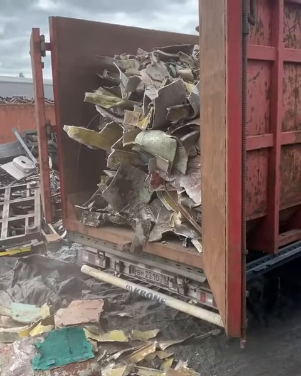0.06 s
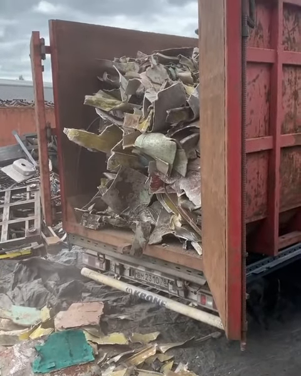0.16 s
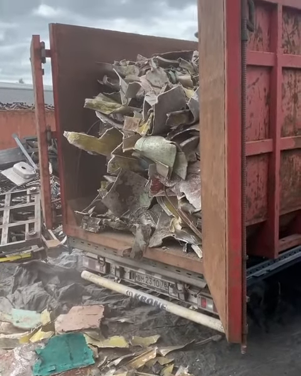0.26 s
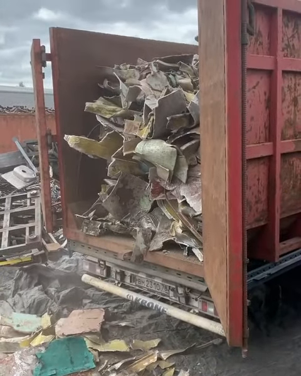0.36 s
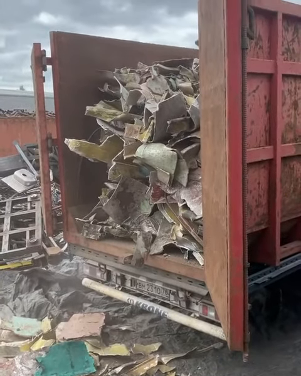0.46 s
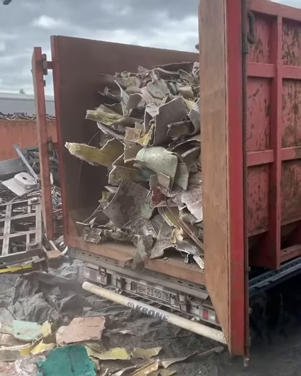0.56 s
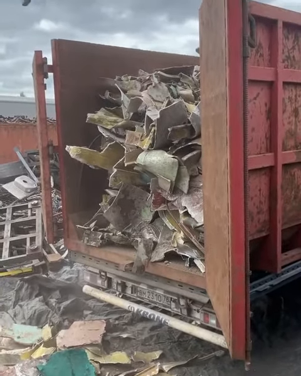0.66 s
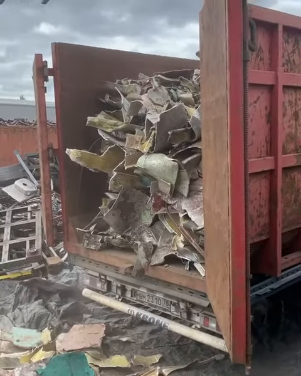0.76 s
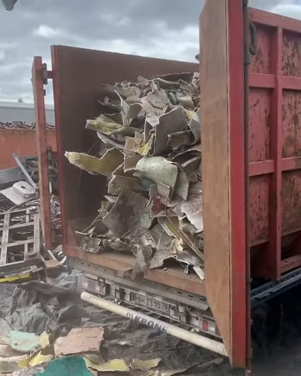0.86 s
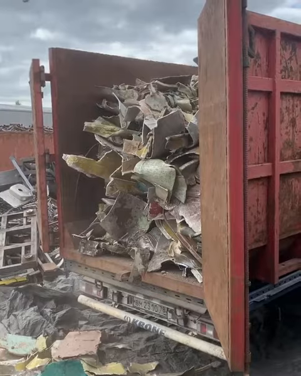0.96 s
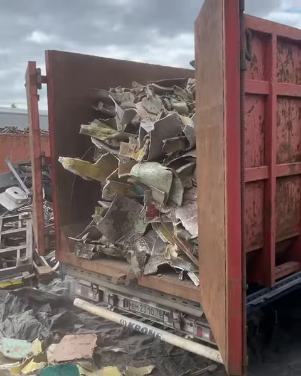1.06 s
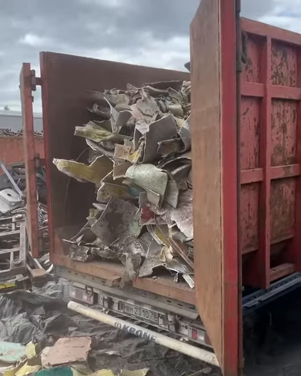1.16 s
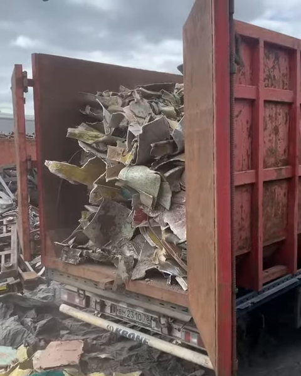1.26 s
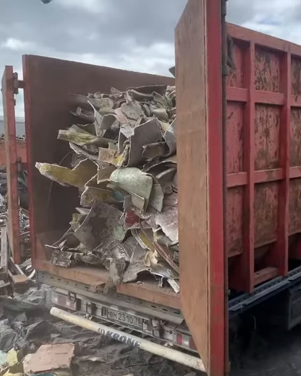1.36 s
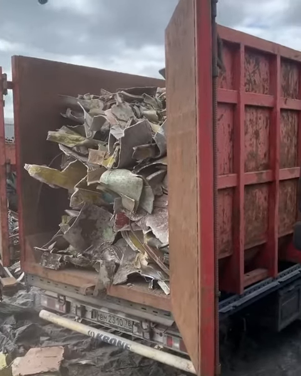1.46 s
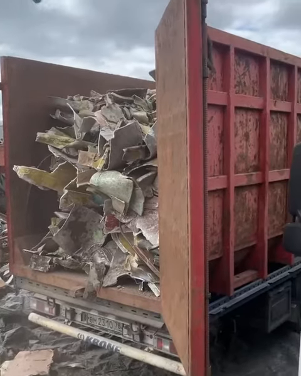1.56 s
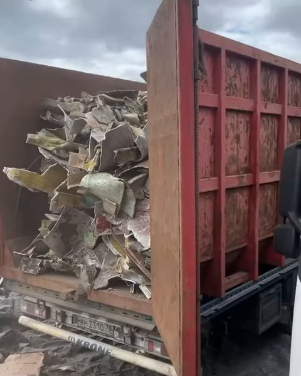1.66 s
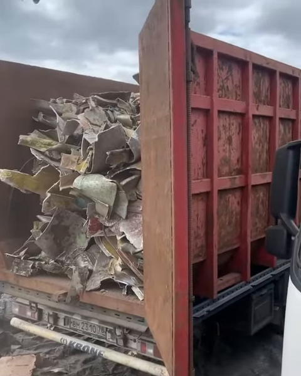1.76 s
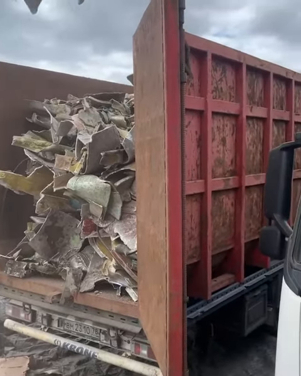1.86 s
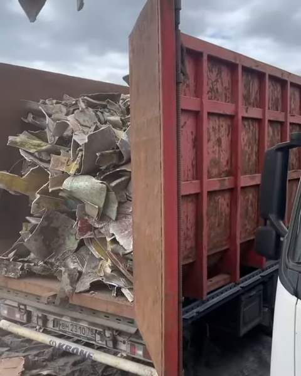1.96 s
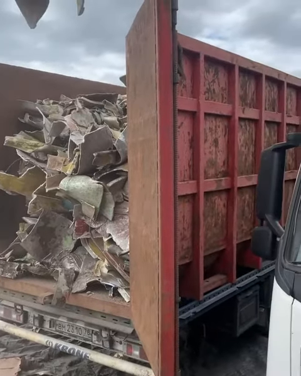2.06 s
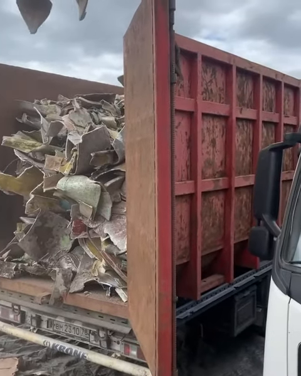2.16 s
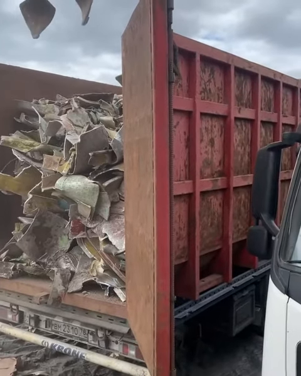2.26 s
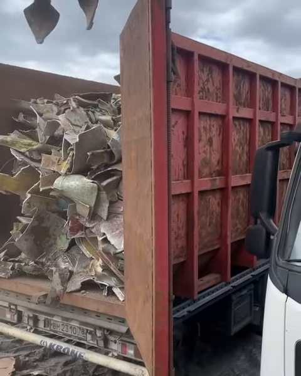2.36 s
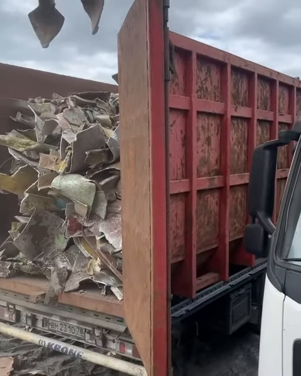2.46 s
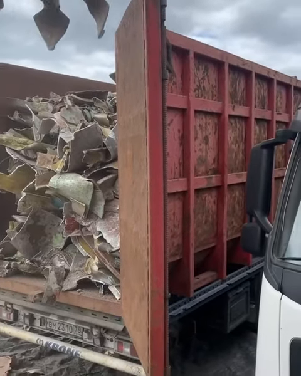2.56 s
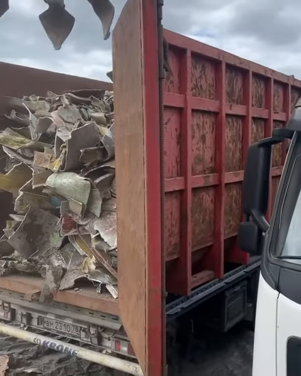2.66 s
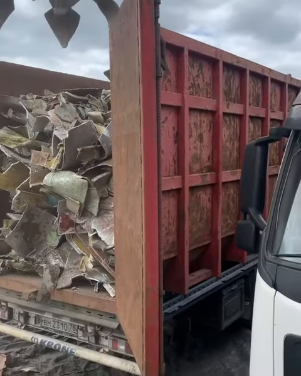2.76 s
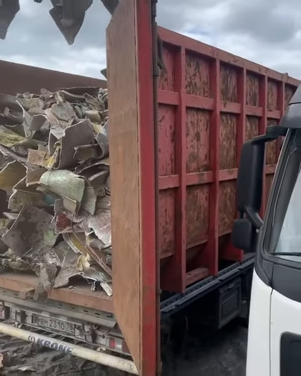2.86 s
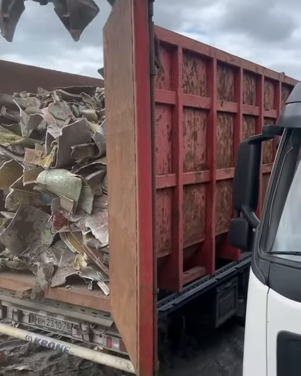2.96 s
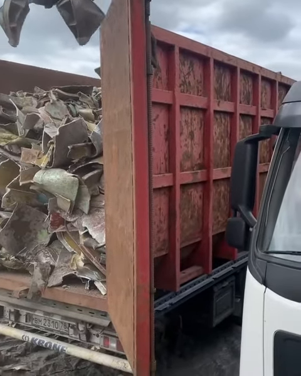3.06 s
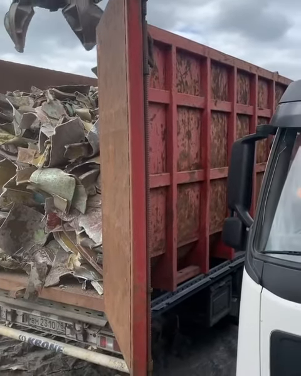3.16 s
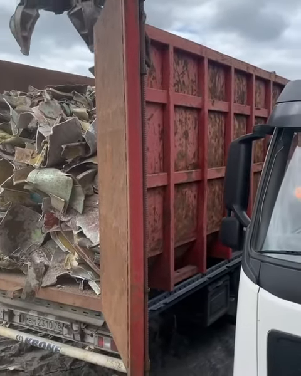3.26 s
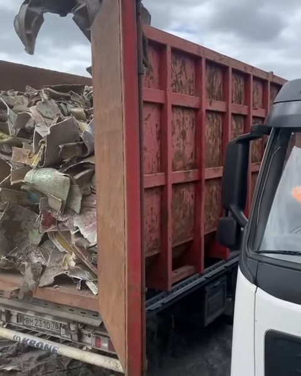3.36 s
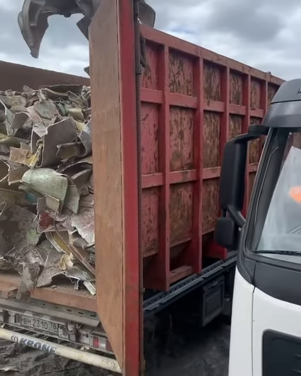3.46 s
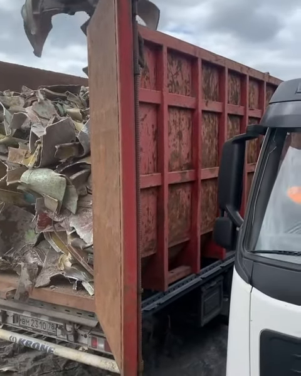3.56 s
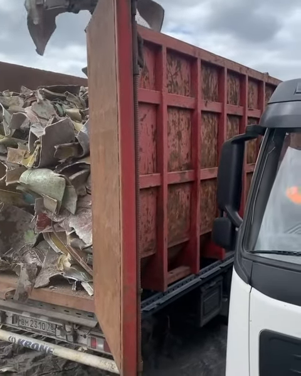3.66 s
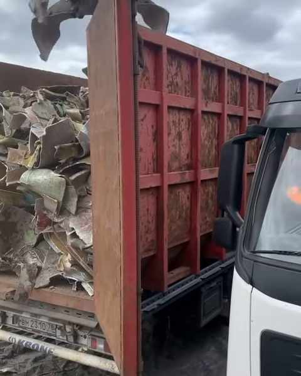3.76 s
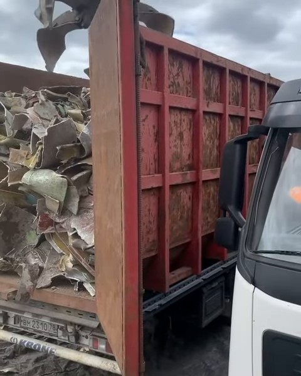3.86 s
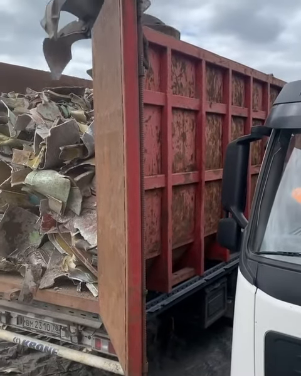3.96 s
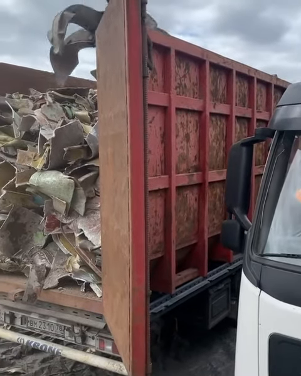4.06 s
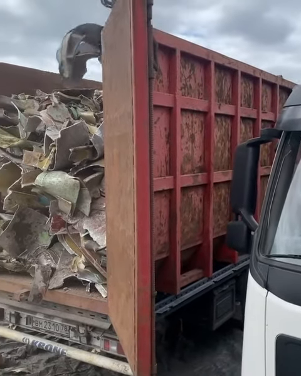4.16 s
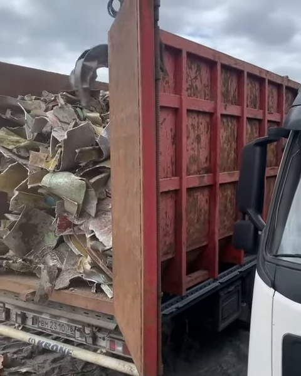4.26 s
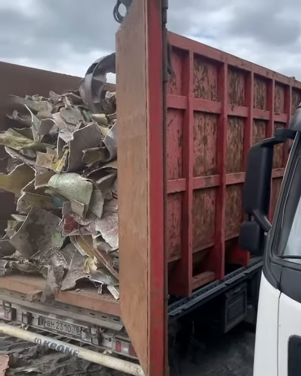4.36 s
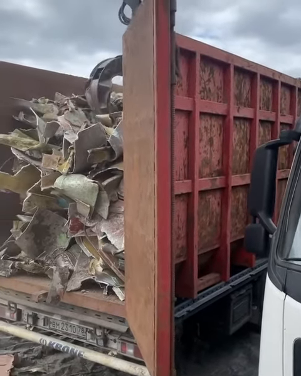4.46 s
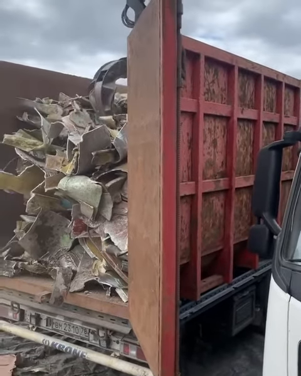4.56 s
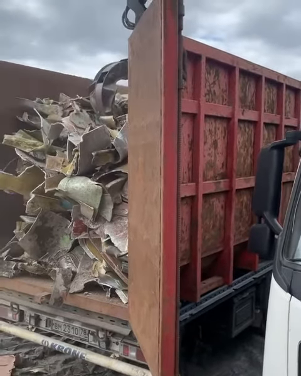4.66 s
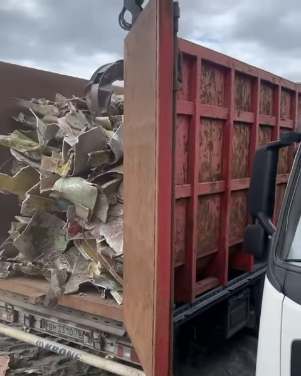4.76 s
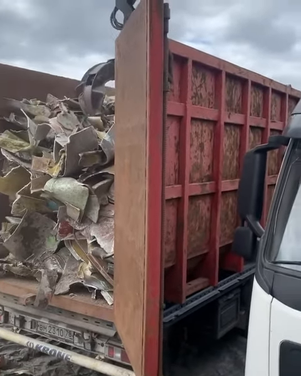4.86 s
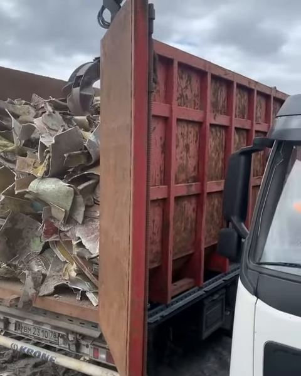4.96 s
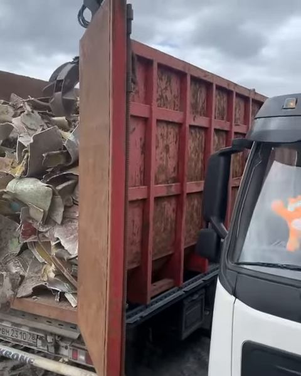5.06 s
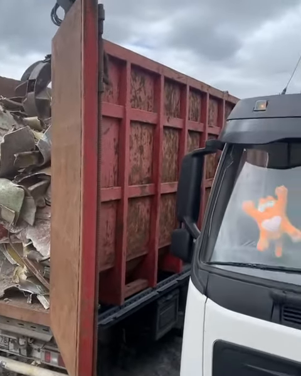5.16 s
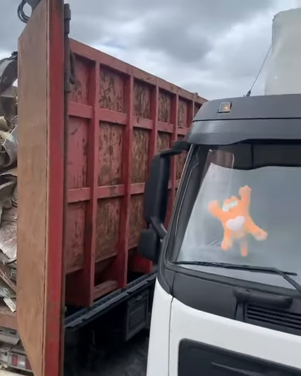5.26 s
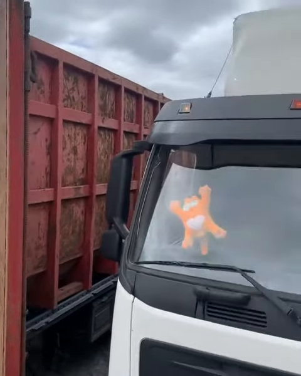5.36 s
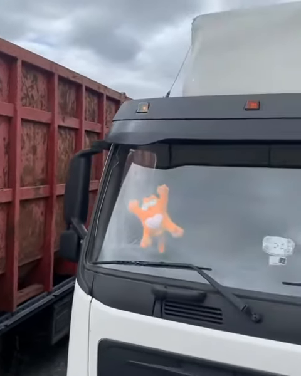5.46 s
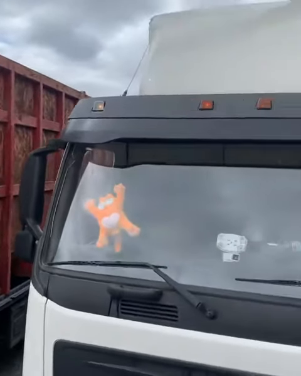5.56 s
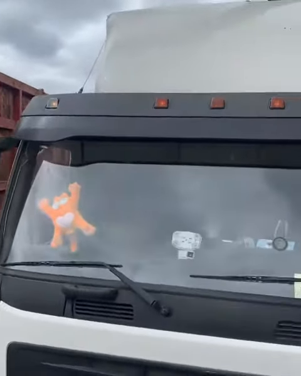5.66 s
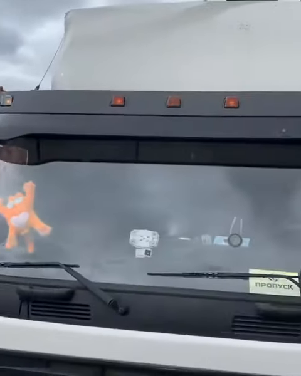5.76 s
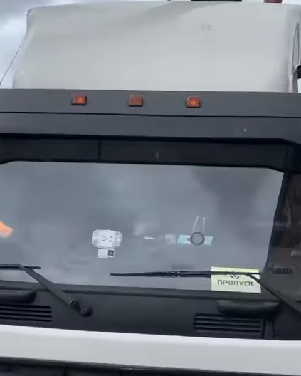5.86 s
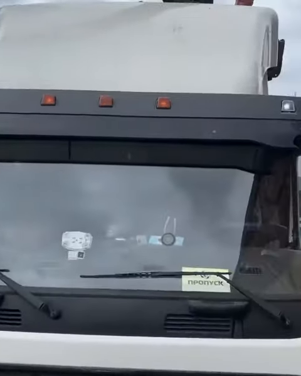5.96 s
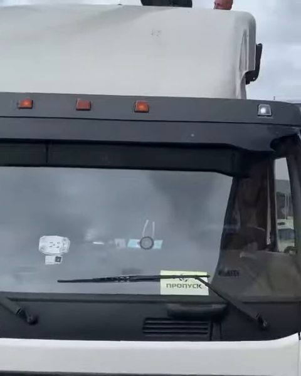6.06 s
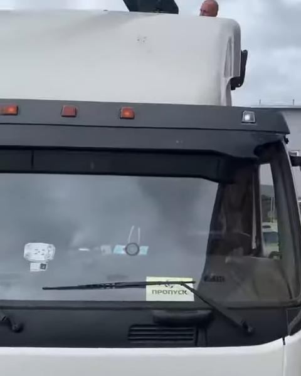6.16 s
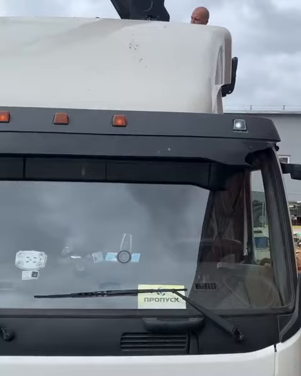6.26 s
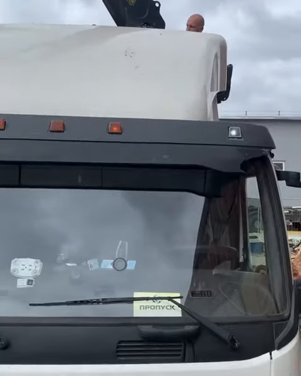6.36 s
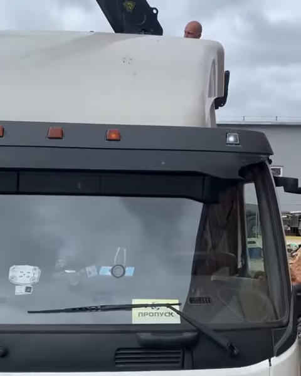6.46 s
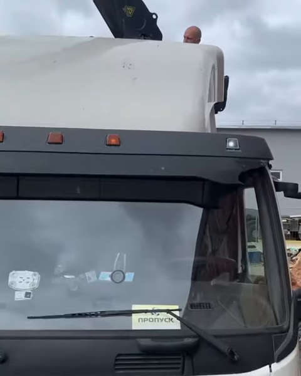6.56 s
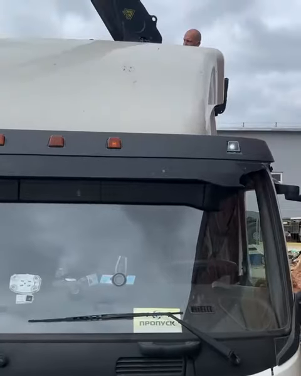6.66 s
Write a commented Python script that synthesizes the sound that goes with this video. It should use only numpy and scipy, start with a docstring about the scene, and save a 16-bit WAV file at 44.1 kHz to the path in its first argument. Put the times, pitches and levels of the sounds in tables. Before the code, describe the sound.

Steady engine throb in an open yard, broken by metallic crashes as a grab bites crumpled sheets and hauls them along a steel trailer.

```python
"""Beside a truck with a steel trailer: a hydraulic grab bites into crumpled sheet scrap and drags it along.
Crunches are swarms of small impacts that ring bent sheets, among hard clanks, booms, snaps and squeals.
Each shakes pieces loose that rattle as they settle; then the haul grows harder and brighter.
The trailer walls echo the scrap by delayed, decaying noise responses.
Firing pulses and clatter make the crane's diesel, slower pulses one further off; oil hisses in the valves."""
import sys
import numpy as np
from scipy import signal
from scipy.fft import rfft, irfft, next_fast_len
from scipy.io import wavfile
from scipy.ndimage import map_coordinates

SR = 44100
rng = np.random.default_rng(int(sys.argv[2]) if len(sys.argv) > 2 else 0)


def dump_mix(stems):
    """Bounce the given channels to the path in sys.argv[1] as a 16-bit WAV at rate SR."""
    frames = np.atleast_2d(stems).T  # one column per channel
    limited = np.clip(frames, -1, 1)  # hard clip at full scale
    pcm = np.round(limited * 32767).astype(np.int16)
    wavfile.write(sys.argv[1], SR, pcm)


N = 295470

T = np.arange(N) / SR
PADDED = next_fast_len(N + 8192)
FREQS = np.arange(PADDED // 2 + 1) * SR / PADDED

# sheets buckle and fall: [onset t/s, length t/s, level/dB before weighting, bass weight/dB, treble weight/dB]
CRUNCH_EVENTS = [(3.918, 0.047, -44, -2, -1), (3.963, 0.035, -28.5, -4, 2), (4.05, 0.063, -28.5, -10, 0),
                 (4.111, 0.047, -17.5, -4.5, -1.5), (4.219, 0.043, -18.5, -1.5, 1),
                 (4.27, 0.043, -21.5, -1.5, -1), (4.324, 0.045, -32, -3, 1), (4.369, 0.013, -34, 11.5, -14),
                 (4.412, 0.084, -33, -0.5, -2.5), (4.524, 0.031, -29.5, 3.5, -6),
                 (4.648, 0.026, -43, 10.5, -14), (4.91, 0.0078, -48.5, 18.5, -15),
                 (4.948, 0.019, -48, 12, -19), (5.012, 0.038, -31, -6, -7), (5.109, 0.054, -35, 3.5, -5),
                 (5.155, 0.048, -31.5, -2, 0), (5.357, 0.047, -24, -2, -6), (5.423, 0.019, -32, 7.5, -0.5),
                 (5.464, 0.028, -29, 5, -4), (5.511, 0.065, -23.5, -2, 0.5), (5.583, 0.038, -26.5, 3.5, 0),
                 (5.729, 0.031, -28.5, 4, 3), (5.772, 0.031, -43.5, 10, 24.5),
                 (5.918, 0.032, -30.5, -12, 5.5), (5.951, 0.078, -29, 8, -25), (6.06, 0.036, -34.5, 7, -13),
                 (6.104, 0.066, -28, 2.5, 1), (6.167, 0.041, -26, 4.5, 0), (6.242, 0.048, -20, 3, 0.5),
                 (6.355, 0.064, -22, 1, 5.5), (6.447, 0.035, -26.5, -5, 5), (6.508, 0.042, -21, 0, 9),
                 (6.555, 0.026, -28, -11, 7.5), (6.653, 0.034, -33, -18, 14)]
# what the heap radiates: [f/Hz, spectral density level/dB]
HEAP_SPECTRUM = [(30, -18), (70, -13.5), (120, -7.5), (180, -1.5), (420, -2), (700, -4), (1000, -7.5),
                 (1500, -5), (2400, -9), (4300, -10.5), (6000, -17), (8000, -21.5), (9500, -22.5),
                 (11800, -29.5), (13000, -41)]
# modes of a stiff piece: [multiple of its pitch, level/dB]
PLATE_MODES = [(0.647, -3.5), (1.001, 1.5), (1.329, -0.5), (1.46, -6), (1.944, -4.5), (2.31, -6.5),
               (2.56, -7), (2.83, -14)]
FIRST_TOUCH_S = CRUNCH_EVENTS[0][0]

# the grab starts to pull and takes up the load
PULL_START_S, PULL_RISE_S = 4.723, 0.3


# tools

def undb(db):
    """Level in decibels to amplitude ratio."""
    return 10 ** (np.asarray(db) / 20)


def unit(x):
    """Normalise the effective value: rms 1."""
    return x / np.sqrt(np.mean(x ** 2) + 1e-18)


def across(table, hz):
    """Linear interpolation of each table column on a log-frequency axis."""
    f, *columns = np.transpose(table)
    return [np.interp(np.log(hz + 1), np.log(f), c) for c in columns]


def ring(x, response):
    """Linear system: convolve a sound with an impulse response."""
    return signal.fftconvolve(np.atleast_2d(x), np.atleast_2d(response), axes=1)[:, :x.shape[-1]]


def colour(x, table):
    """Minimum-phase filter: the folded cepstrum of a level response gives a causal impulse response."""
    size = 4096
    level_db, = across(table, np.arange(size // 2 + 1) * SR / size)
    cepstrum = irfft(np.log(undb(level_db)))
    cepstrum[1:size // 2] *= 2
    cepstrum[size // 2 + 1:] = 0
    return ring(x, irfft(np.exp(rfft(cepstrum))))


def heft(x, bass_db, treble_db, bass_hz=600, treble_hz=3600):
    """Spectral weighting by size: big pieces add bass, thin edges add treble."""
    size = x.shape[1]
    hz = np.arange(size // 2 + 1) * SR / size
    spectrum = rfft(x)
    bass = irfft(spectrum / (1 + (hz / bass_hz) ** 4), size)
    treble = irfft(spectrum * (1 - 1 / (1 + (hz / treble_hz) ** 4)), size)
    return x + (undb(bass_db) - 1) * bass + (undb(treble_db) - 1) * treble


def walk(rate, size=N):
    """Slow random modulation: random points, rate a second, joined by lines; spread near 1."""
    points = rng.standard_normal(4096)
    return 1.21 * np.interp(T[:size] * rate, np.arange(len(points)), points)


def wander(x, depth, rate):
    """Frequency modulation by time warping: all resonances drift together by the share depth."""
    place = np.cumsum(1 + depth * walk(rate, size=x.shape[1]))
    return np.array([map_coordinates(row, [place], mode="mirror") for row in x])


def tone(hz, waver, rate):
    """Frequency-modulated sine: the phase integrates a wavering pitch; rms 1."""
    turns = np.cumsum(hz * (1 + waver * walk(rate))) / SR
    return unit(np.sin(2 * np.pi * turns))


def fade(t, t60):
    """Exponential damping: 60 dB down after t60."""
    return np.exp(-np.log(1000) * t / t60)


def ramp(start_s, rise_s):
    """Linear onset: from 0 to 1 in rise_s, beginning at start_s."""
    return np.clip((T - start_s) / rise_s, 0, 1)


def add(out, sound, s, db):
    """Superposition: mix a sound in at time s."""
    start = int(s * SR)
    out[:, start:start + sound.shape[1]] += undb(db) * sound[:, :N - start]


def body(x, length):
    """Onset normalisation: each channel has rms 1 over the first length seconds plus 8 ms."""
    onset = x[:, :int((length + .008) * SR)]
    return x / np.sqrt(np.mean(onset ** 2, axis=1, keepdims=True) + 1e-18)


# engines and hydraulics

def effort(db_per_s=1.19, lower_s=2.51, lower_rise_s=0.08, lower_db=2.5):
    """Load response in dB: a steady gain as the boom works and a step as the grab is lowered."""
    return db_per_s * T + lower_db * ramp(lower_s, lower_rise_s)


def firings(hz, cylinders_db, scatter_db):
    """Periodic excitation: unequal pulses through a silencer; also returns the phase within each firing."""
    # silencer response: [f/Hz, level/dB]
    silencer = [(25, -11), (44, -3.5), (90, -1.5), (135, -2), (180, -3.5), (240, -7.5), (365, -11.5),
                (560, -30), (900, -24.5), (3000, -88)]
    turns = np.cumsum(hz * (1 + 0.0021 * walk(3.33))) / SR
    at = np.flatnonzero(np.diff(np.floor(turns)))
    scatter = scatter_db * rng.standard_normal(N)[:len(at)]
    pulses = np.zeros(N)
    pulses[at] = undb(np.resize(cylinders_db, len(at)) + scatter)
    return unit(colour(pulses - pulses.mean(), silencer)), turns % 1


def diesels(start_db=-47, exhaust_db=-5, far_db=-10, clatter_db=0, hum_waver=0.00804, hum_flutter_db=2.0,
            throb=0.11, drift=.012, swell_db=0.6):
    """Source and resonator: pulsed noise excites the housing, beside hum and the thuds of two engines."""
    # combustion clatter of the block: [f/Hz, spectral density level/dB]
    block_spectrum = [(30, -6), (55, -29), (85, -0.5), (180, -7), (450, -6.5), (700, -3), (1200, -4),
                      (1800, -10), (2600, -22), (4000, -29), (12000, -29.5)]
    # housing resonances: [f/Hz, full width at half amplitude/Hz, level over the clatter/dB]
    housing_modes = [(358, 57, 10), (554.7, 100, 11.5)]
    # engine and pump hum: [f/Hz, level against the clatter/dB, gain as the grab is lowered/dB]
    hum_lines = [(167, -23.5, -0.5), (300.4, -19, -1), (368, -11.5, 0), (550, -13.5, 3)]
    db = start_db + effort()
    cylinders_db = [9.0, 10.0, 12.5, -4.0, 11.0, 10.0]
    near, phase = firings(45.1, cylinders_db, scatter_db=-1.0)
    far, _ = firings(39.35, [0, 1, -1, 0], scatter_db=-3.0)
    knock = .06 * np.cos(2 * np.pi * phase)
    # the throb sags through each firing interval and jumps back at the next
    sag = throb * np.cos(2 * np.pi * phase / len(cylinders_db))
    pulsing = 1 + knock + sag

    clatter = colour(rng.standard_normal((2, N)) * pulsing, block_spectrum)
    spectrum = rfft(clatter, PADDED)
    housing = np.zeros((2, N))
    for hz, width, gain in housing_modes:
        resonance = irfft(spectrum / (1 + (2 * (FREQS - hz) / width) ** 2), PADDED)[:, :N]
        # each swells and sinks on its own
        housing += resonance * undb(gain + swell_db * walk(9))
    clatter = unit(wander(clatter + housing, drift, rate=5)) * undb(clatter_db)

    lowering = ramp(2.51, 0.08)  # in step with effort()
    hum = np.zeros(N)
    for hz, gain, more in hum_lines:
        hum += undb(gain + more * lowering + hum_flutter_db * walk(12)) * tone(hz, hum_waver, rate=16)

    # low thud bends round the truck: both engines' thuds change by half the dB of the clatter
    thud = undb(exhaust_db) * near + undb(far_db) * far
    thud = thud * undb(db[0] + 0.5 * (db - db[0]))
    shared_only = np.array([[1], [0]])
    return clatter * undb(db) + (hum * pulsing * undb(db) + thud) * shared_only


def valves(oil_db=-65.5, oil_per_engine_db=0.96, jaws_s=3.15, jaws_rise_s=0.3, jaws_db=-61, flutter_db=.7):
    """Flow noise: oil hisses harder with engine load; a thinner hiss joins as the jaws are driven."""
    # valve hiss: [f/Hz, spectral density level/dB]
    oil_spectrum = [(1000, -49), (3000, 11.5), (5600, 13.5), (6500, -25), (12000, -12)]
    # hiss of the jaws' valve: [f/Hz, spectral density level/dB]
    jaw_spectrum = [(1500, -25), (4000, 2), (7500, -10), (9500, 4), (11500, -15), (13000, -9)]
    oil = unit(colour(rng.standard_normal((2, N)), oil_spectrum))
    oil = oil * undb(oil_db + oil_per_engine_db * effort())
    jaws = unit(colour(rng.standard_normal((2, N)), jaw_spectrum))
    jaws = jaws * undb(jaws_db) * ramp(jaws_s, jaws_rise_s)
    return (oil + jaws) * undb(flutter_db * walk(8.2))


# excitation and resonators of the scrap

def impacts(count, rate, scatter_db):
    """Poisson process: random small blows of uneven force, on average rate a second."""
    chance, force = rng.random(count), rng.standard_normal(count)
    return (chance < rate / SR) * undb(scatter_db * np.clip(force, -2, 2))


def burst(length, rate=1300, scatter_db=3, bite=0.63, bite_t60=0.097, release_t60=0.08, attack_s=0.0085,
          jerks_per_s=130, jerk_db=3, size=24000):
    """Stick-slip swarm: impacts build quickly to their hardest, come in jerks, then die away."""
    t = np.arange(size) / SR
    attack = np.minimum(t / attack_s, 1) * (1 + bite * fade(t, bite_t60))
    release = fade(np.maximum(t - length, 0), release_t60)
    jerks = undb(jerk_db * np.clip(walk(jerks_per_s, size=size), -1.5, 1.5))
    return attack * release * jerks * impacts(size, rate, scatter_db)


def sheet(ring_t60=.13, crack_t60=.012, ring_db=3, spacing=.11, size=16384):
    """Modal response of a bent sheet: a crack and scattered modes, the high ones dying first; unit energy."""
    t, hz = np.arange(size) / SR, np.arange(size // 2 + 1) * SR / size
    # mean mode spacing grows with pitch
    apart_hz = 20 + spacing * np.minimum(hz, 4500)
    present = rng.random(len(hz)) < SR / size / apart_hz
    phases = np.exp(2j * np.pi * rng.random((2, len(hz))))
    modes = present * np.sqrt(apart_hz) * phases
    low = 1 / (1 + (hz / 3000) ** 4)
    low_tones = irfft(modes * low) * fade(t, ring_t60)
    high_tones = .75 * irfft(modes * (1 - low)) * fade(t, ring_t60 * .6)
    crack = rng.standard_normal((2, size)) * fade(t, crack_t60)
    return unit(unit(crack) + undb(ring_db) * unit(low_tones + high_tones)) / np.sqrt(size)


# loose and hauled scrap

def pull(start_db=-39.5, db_per_s=5):
    """Exponential growth: the haul sets in as the grab pulls and keeps gaining level."""
    return ramp(PULL_START_S, PULL_RISE_S) * undb(start_db + db_per_s * (T - PULL_START_S))


def unrest(loose_db=-9, shake_s=0.06, fall_s=0.069, settle_t60_s=1.09):
    """Energy balance: loose pieces land a fall after each crunch and feed in energy, which drains away."""
    # loose_db is against a crunch held for shake_s
    feed = np.zeros(N)
    for s, length, db, _, _ in CRUNCH_EVENTS:
        start, end = int((s + fall_s) * SR), int((s + fall_s + length) * SR)
        feed[start:end] += undb(db + loose_db) ** 2 / (shake_s * SR)
    kept = fade(1 / SR, settle_t60_s) ** 2
    return np.sqrt(signal.lfilter([1], [1, -kept], feed))


def rumble(low_hz=42, high_hz=105, load_db=-46, settle_db=-32):
    """Band-limited impact noise: moving load and settling pieces bump on the trailer floor."""
    load = undb(load_db) * ramp(PULL_START_S, PULL_RISE_S)
    strength = np.hypot(load, undb(settle_db) * unrest())
    bumps = impacts(N, 300, 5.4) * rng.standard_normal((2, N))
    floor = signal.butter(3, [low_hz, high_hz], "band", fs=SR, output="sos")
    return unit(signal.sosfilt(floor, bumps)) * strength


def rattle(rate=280, scatter_db=4, uneven_db=4, count=130, contact_s=.055, size=8192):
    """Friction as repeated impact: loose sheets catch and slip in brief, overlapping scrapes."""
    contact = np.sin(np.pi * np.minimum(np.arange(size) / SR / contact_s, 1))
    out = np.zeros((2, N))
    for s in np.linspace(FIRST_TOUCH_S - .1, N / SR, count, endpoint=False):
        blows = contact * impacts(size, rate, scatter_db)
        scrape = ring(blows, sheet(ring_db=5, spacing=.16, size=size))
        add(out, unit(scrape), s, rng.uniform(-uneven_db, uneven_db))
    # rms 1 over the sounding part
    return unit(colour(out, HEAP_SPECTRUM)) * np.sqrt(np.mean(T > FIRST_TOUCH_S))


def grinding(settle_bass_db=-1, settle_treble_db=-10, pull_bass_db=6, pull_treble_db=-6,
             pull_bass_db_per_s=-3.5, pull_treble_db_per_s=7.5):
    """Energy addition: pieces settle dully; hauled ones scrape ever thinner and brighter and take over."""
    settling, hauled = unrest() ** 2, pull() ** 2
    share = hauled / (settling + hauled + 1e-18)
    hauling_s = np.maximum(T - PULL_START_S, 0)
    # more thin edges scrape as the pull hardens, while the big pieces lift clear
    edges_db = pull_treble_db + pull_treble_db_per_s * hauling_s
    big_db = pull_bass_db + pull_bass_db_per_s * hauling_s
    bass_db = (1 - share) * settle_bass_db + share * big_db
    treble_energy = (1 - share) * undb(settle_treble_db) ** 2 + share * undb(edges_db) ** 2
    return heft(rattle(), bass_db, 10 * np.log10(treble_energy)) * np.sqrt(settling + hauled)


def offcuts(level_db=-10, low_hz=800, high_hz=4600, ring_t60=.06, count=130, uneven_db=4, bounce_s=.03,
            rebound=.55, small_db_per_octave=-4, contact_s=.001, size=6000):
    """Inelastic rebound: small stiff pieces land and bounce twice, sooner and softer; higher ones are fainter."""
    t = np.arange(size) / SR
    envelope = np.minimum(t / contact_s, 1) * fade(t, ring_t60)
    sizes = rebound ** np.arange(3)
    out = np.zeros((2, N))
    for when, small, force, drop in rng.random((count, 4)):
        s = FIRST_TOUCH_S + when * (N / SR - FIRST_TOUCH_S)
        hz = low_hz * (high_hz / low_hz) ** small
        tones = np.zeros((2, size))
        for ratio, mode_db in PLATE_MODES:
            tones += undb(mode_db) * np.sin(2 * np.pi * (hz * ratio * t + rng.random((2, 1))))
        landing_s = (np.cumsum(sizes) - 1) * bounce_s * (1 + drop)
        landings = np.zeros((2, size))
        landings[:, (landing_s * SR).astype(int)] = sizes
        db = uneven_db * (2 * force - 1) + small_db_per_octave * np.log2(hz / low_hz)
        add(out, ring(landings, tones * envelope), s, db)
    even = unit(out) * np.sqrt(np.mean(T > FIRST_TOUCH_S))
    return even * undb(level_db) * np.hypot(unrest(), pull())


# the grab's bites and blows

def squeals(waver=0.0031, rise_s=0.029, ring_t60=0.13):
    """Self-excited vibration: a slipping edge drives one mode, which rings on after it lets go."""
    # an edge slips and sings: [onset t/s, length t/s, f/Hz, level/dB]
    slips = [(5.3, 0.17, 2800, -61), (3.7, 0.022, 4000, -33), (6.533, 0.18, 5600, -43),
             (6.616, 0.064, 1983, -31), (6.644, 0.024, 4000, -20), (6.62, 0.068, 3290, -37)]
    out = np.zeros(N)
    for s, length, hz, db in slips:
        drive = ramp(s, rise_s) * fade(np.maximum(T - s - length, 0), ring_t60)
        out += undb(db) * drive * tone(hz, waver, rate=120)
    return np.array([out, out * 0.15])


def booms(sharpness=2.94):
    """Damped resonance: a swarm of impacts drives one broad mode of a large flexing panel."""
    # panel flexes: [onset t/s, length t/s, f/Hz, level/dB]
    flexes = [(4.11, 0.013, 230, -26.5), (4.113, 0.038, 434, -18), (4.158, 0.016, 216, -26),
              (4.228, 0.062, 169, -26), (4.271, 0.021, 610, -23), (4.532, 0.025, 177, -36.5),
              (5.745, 0.024, 201, -33.5), (6.13, 0.14, 48, -44), (6.242, 0.027, 410, -28.5),
              (6.273, .035, 253, -27), (6.365, 0.02, 246, -30), (6.516, 0.025, 750, -20.5),
              (6.522, 0.035, 238, -38), (6.514, 0.024, 1330, -23)]
    out = np.zeros((2, N))
    for s, length, hz, db in flexes:
        blows = ring(burst(length), sheet(ring_db=-17.5))
        b, a = signal.iirpeak(hz, sharpness, fs=SR)
        boom = signal.lfilter(b, a, signal.lfilter(b, a, blows))
        add(out, body(boom, length), s, db)
    return out


def ticks(sharpness=1.8, snap=1.7):
    """Impulse excitation: a thin edge snaps free and skips over its neighbour, ringing high and briefly."""
    # edges snap and scratch: [onset t/s, length t/s, f/Hz, level/dB]
    snaps = [(4.05, 0.007, 9500, -37), (4.063, 0.0099, 10000, -46), (4.129, .025, 10800, -38.5),
             (4.461, 0.004, 11600, -47.5), (4.535, 0.014, 10600, -50.5), (4.594, .012, 9000, -51.5),
             (4.794, .014, 10600, -59), (5.03, 0.017, 10500, -51), (5.091, .016, 7000, -48),
             (5.695, .012, 7900, -50), (5.861, 0.012, 6260, -44), (6.177, 0.0088, 6260, -31),
             (6.336, 0.021, 6260, -35), (6.489, 0.039, 6600, -36), (6.516, 0.016, 9200, -26)]
    out = np.zeros((2, N))
    for s, length, hz, db in snaps:
        skips = burst(length, rate=660, release_t60=0.039)
        skips[0] += snap
        edge = ring(skips, sheet(ring_t60=0.06, ring_db=0, spacing=0.14))
        b, a = signal.iirpeak(min(hz, 13000), sharpness, fs=SR)
        sound = signal.lfilter(b, a, signal.lfilter(b, a, edge))
        add(out, body(sound, length), s, db)
    return out


def clanks(crack_db=-1, crack_treble_db=-7, crack_t60=0.023, contact_s=0.0045, flex=0.0099, flex_t60=0.12,
           pair=0.012, size=24000):
    """Modal beating: after a crack, close pairs of stiff modes beat and sink a little as the piece unbends."""
    # hard blows: [onset t/s, reference pitch f/Hz, level/dB, ring t60/s of the lowest modes]
    hard_blows = [(3.968, 1740, -36, .14), (4.122, 1500, -27, .1), (4.132, 1250, -21, .12),
                  (4.145, 1560, -22, .11), (4.159, 730, -23, .1), (4.225, 1218, -26, .18),
                  (4.258, 1820, -25, .16), (4.285, 1437, -22, .28), (4.35, 1140, -31, .3),
                  (4.456, 1880, -36, .18), (4.545, 1330, -33, .2), (4.632, 1700, -41, .15),
                  (4.686, 1200, -42, .14), (5.02, 1500, -37, .2), (5.168, 1510, -36, .2),
                  (5.362, 1850, -30, .2), (5.467, 1650, -32, .18), (5.52, 1950, -30.5, .16),
                  (5.59, 1400, -32, .2), (5.761, 1150, -29, .16), (5.958, 1640, -29, .22),
                  (6.122, 1360, -30, .2), (6.182, 1900, -28, .16), (6.249, 1430, -23, .18),
                  (6.289, 1980, -25, .15), (6.377, 1240, -26, .18), (6.392, 1600, -25, .18),
                  (6.518, 1362, -17.5, .3), (6.545, 1410, -18.5, .14), (6.586, 1600, -26, .2)]
    t = np.arange(size) / SR
    seconds = np.cumsum(1 + flex * fade(t, flex_t60)) / SR
    crack_envelope = np.minimum(t / contact_s, 1) * fade(t, crack_t60)
    out = np.zeros((2, N))
    for s, hz, db, t60 in hard_blows:
        tones = np.zeros((2, size))
        for ratio, mode_db in PLATE_MODES:
            turns = hz * ratio * seconds
            start, twin = rng.random((2, 2, 1))
            first = np.sin(2 * np.pi * (turns + start))
            second = .5 * np.sin(2 * np.pi * (turns * (1 + pair) + twin))
            # higher modes die sooner
            tones += undb(mode_db) * (first + second) * fade(t, t60 / np.sqrt(max(ratio, 1)))
        crack = colour(rng.standard_normal((2, size)) * crack_envelope, HEAP_SPECTRUM)
        crack = heft(crack, 0, crack_treble_db)
        add(out, body(tones, 0) + undb(crack_db) * body(crack, 0), s, db)
    return out


def crunches(bend=.009, bend_rate=45):
    """Impact-excited plates: swarms of blows ring two sheets, whose pitch bends as they buckle."""
    out = np.zeros((2, N))
    for s, length, db, bass_db, treble_db in CRUNCH_EVENTS:
        clang = np.zeros((2, 24000))
        for _ in range(2):
            clang += wander(ring(burst(length), sheet()), bend, bend_rate)
        crunch = body(colour(clang, HEAP_SPECTRUM), length)
        add(out, heft(crunch, bass_db, treble_db), s, db)
    return out


# the space and the microphone

def trailer(x, t60_s=0.42, echo_db=-9, first_s=0.016, size=16000, count=16):
    """Reverberation: steel walls return decaying noise, redrawn as the grab and its load move along."""
    t = np.arange(size) / SR
    # nothing returns before first_s
    decay = fade(t, t60_s) * np.clip(t / first_s - 1, 0, 1)
    places = np.linspace(FIRST_TOUCH_S * SR, N, count + 1).astype(int)
    out = x.copy()
    for start, end in zip(places, places[1:]):
        tail = unit(rng.standard_normal((2, size)) * decay) / np.sqrt(size)
        add(out, signal.fftconvolve(x[:, start:end], tail, axes=1), start / SR, echo_db)
    return out


def ports(x, leftness, spread_db):
    """Interaural-style coherence: row 0 is common to two spaced ports, row 1 sets them apart."""
    # phase between the ports: [f/Hz, lead of the left/rad]
    port_phase = [(1400, 0), (2300, 1.3), (3500, 1.6), (4300, 3.1), (5200, 3.1), (6300, 6.3), (7500, 6.3),
                  (8300, 9.4), (9600, 9.4), (10400, 12.6), (11700, 12.6), (12500, 15.7)]
    # before spread_db and leftness: [f/Hz, unlike share/dB, left minus right/dB]
    port_field = [(80, -26, 0), (180, -19, 1), (350, -12, 2), (700, -6.5, 3.3), (1400, -9, .3),
                  (2800, -9, .2), (4700, -15, 0), (7000, -7.5, 0), (12000, -7, 0)]
    shared, apart = rfft(x, PADDED)
    phase, = across(port_phase, FREQS)
    apart_db, pan_db = across(port_field, FREQS)
    # more unlike where the ports are a quarter cycle apart
    share = undb(apart_db + spread_db) + .2 * np.sin(phase) ** 2
    side = np.array([[1], [-1]])
    pair = (shared + 1j * side * share * apart) / np.sqrt(1 + share ** 2)
    panned = pair * undb(side * leftness * pan_db / 2)
    return irfft(panned * np.exp(1j * side * phase / 2), PADDED)[:, :N]


def scene():
    """Superposition: echoing scrap on the left, the machinery nearer the middle and more direct."""
    machinery = diesels() + valves()
    loose = rumble() + grinding() + offcuts()
    struck = squeals() + booms() + ticks() + clanks() + crunches()
    scrap = trailer(loose + struck)
    return ports(machinery, leftness=0.23, spread_db=-2.0) + ports(scrap, leftness=1.14, spread_db=1.0)


def record(dry, ceiling=0.75, low_hz=34, top_hz=13150):
    """Band limiting and soft saturation: deep bass is shed, the highest peaks rounded, the top cut steeply."""
    bass_cut = signal.butter(4, low_hz, "high", fs=SR, output="sos")
    thinned = signal.sosfilt(bass_cut, dry)
    rounded = thinned / (1 + (thinned / ceiling) ** 6) ** (1 / 6)
    top_cut = signal.ellip(10, .2, 80, top_hz, fs=SR, output="sos")
    return signal.sosfilt(top_cut, rounded)


dry = scene()
out = record(dry)
dump_mix(out)
```